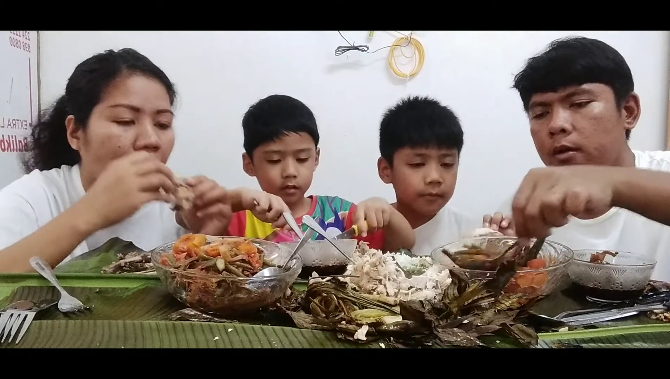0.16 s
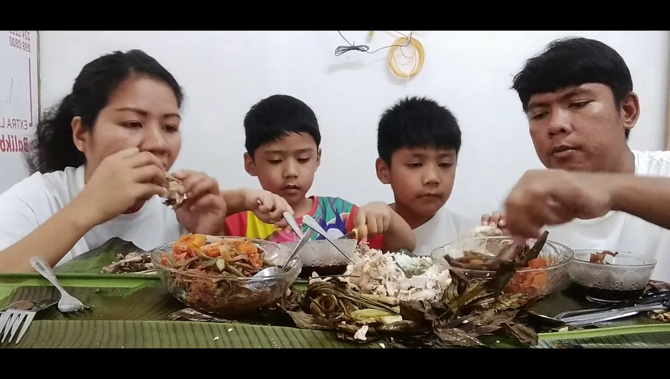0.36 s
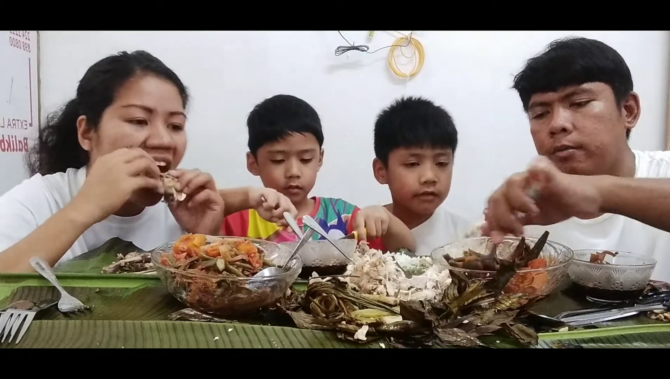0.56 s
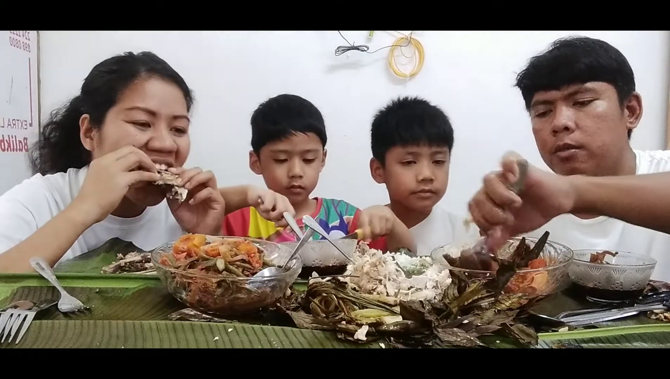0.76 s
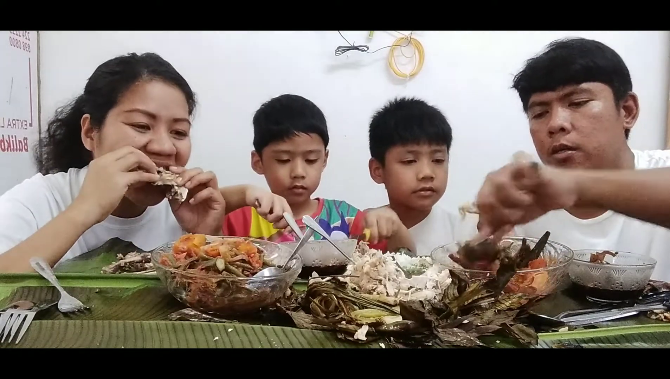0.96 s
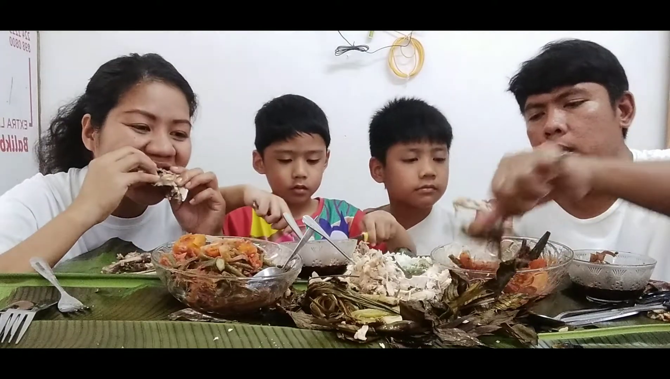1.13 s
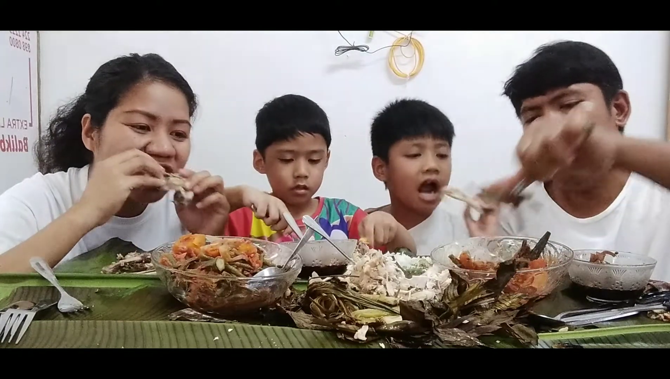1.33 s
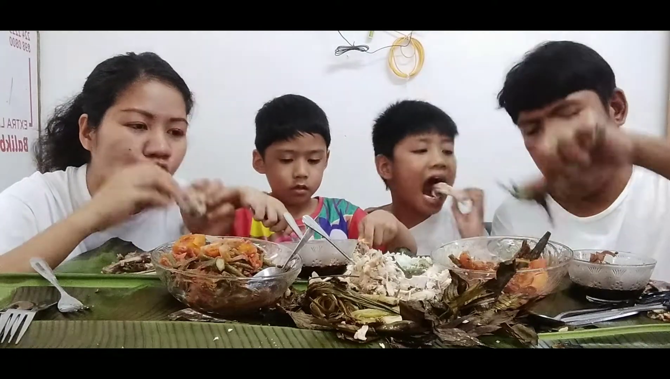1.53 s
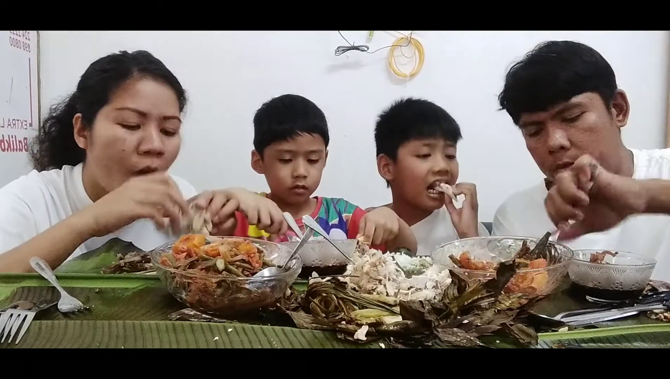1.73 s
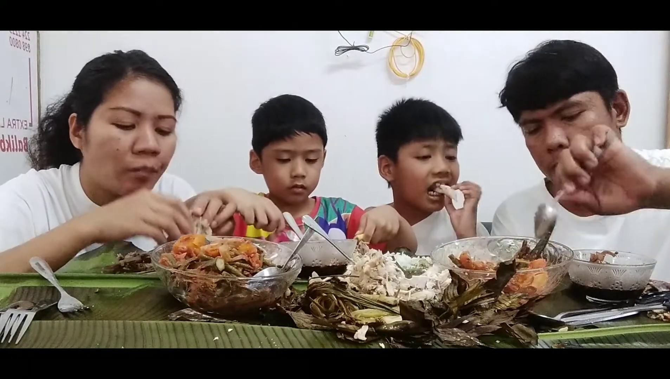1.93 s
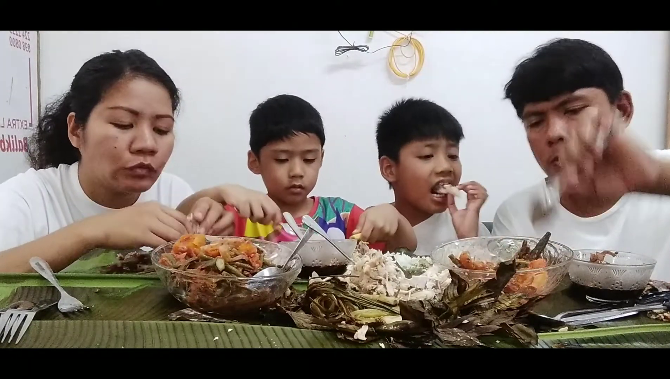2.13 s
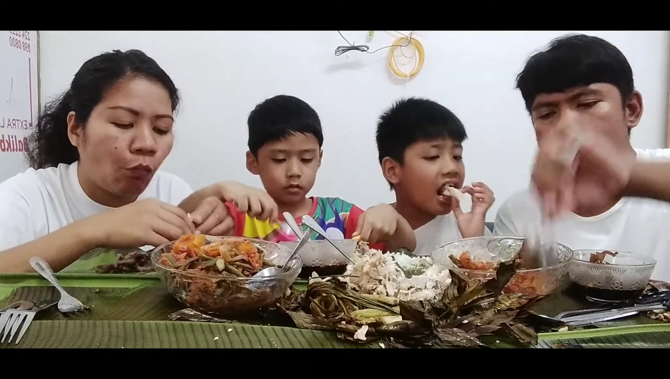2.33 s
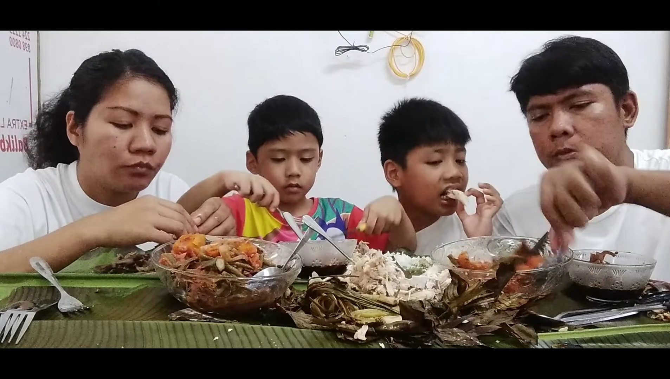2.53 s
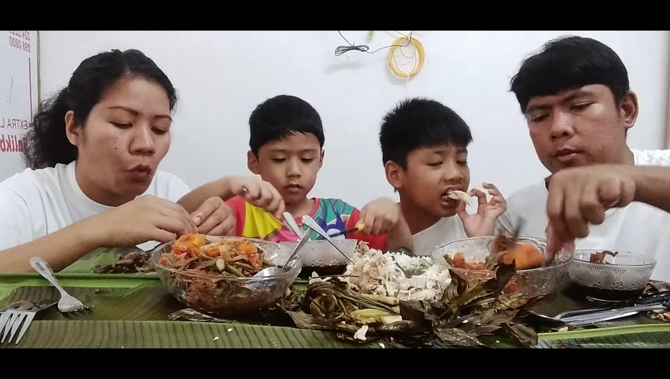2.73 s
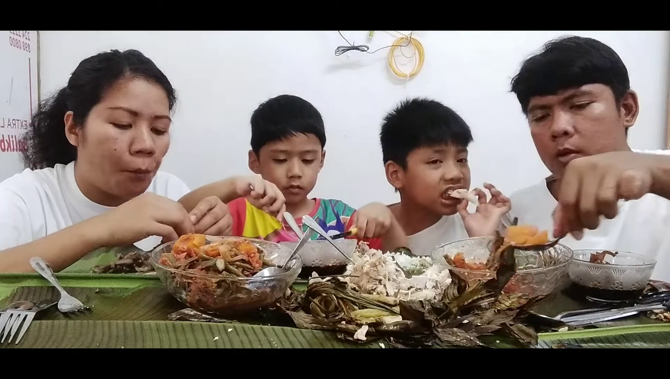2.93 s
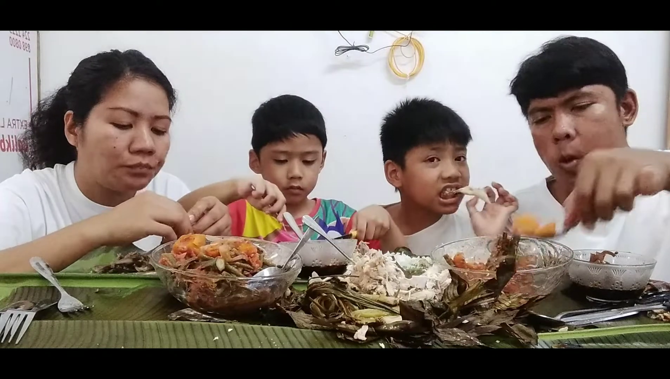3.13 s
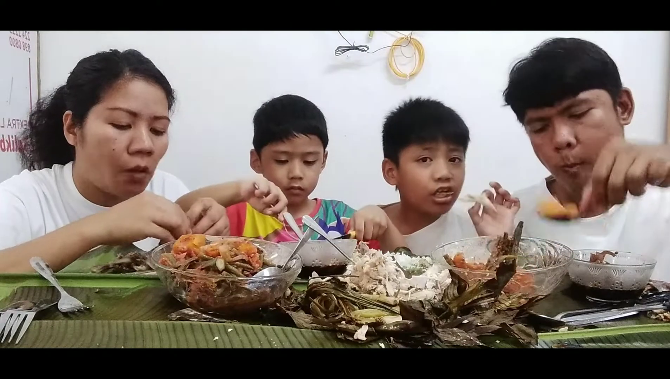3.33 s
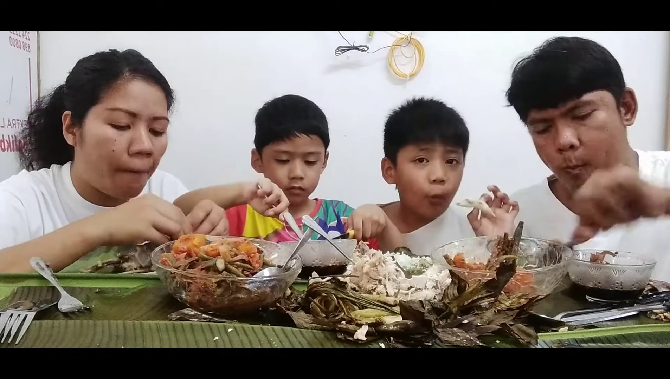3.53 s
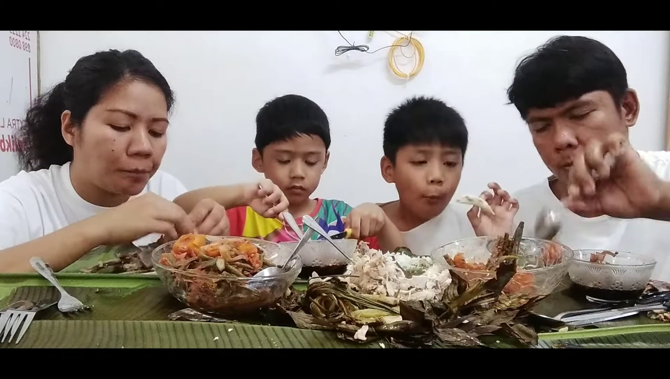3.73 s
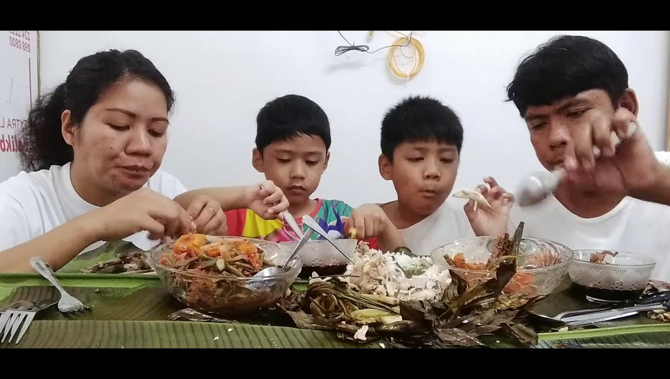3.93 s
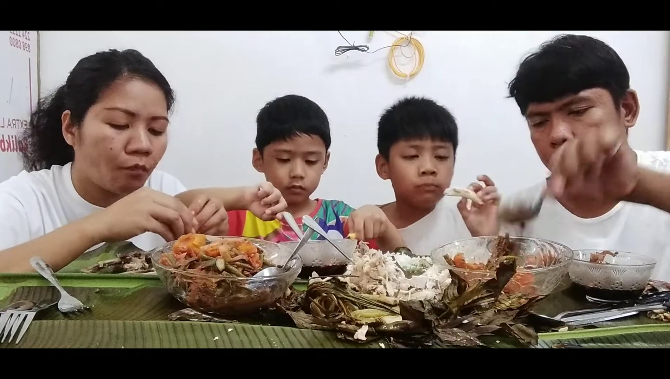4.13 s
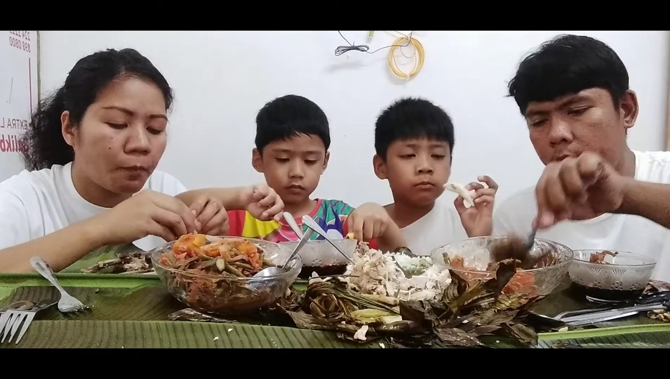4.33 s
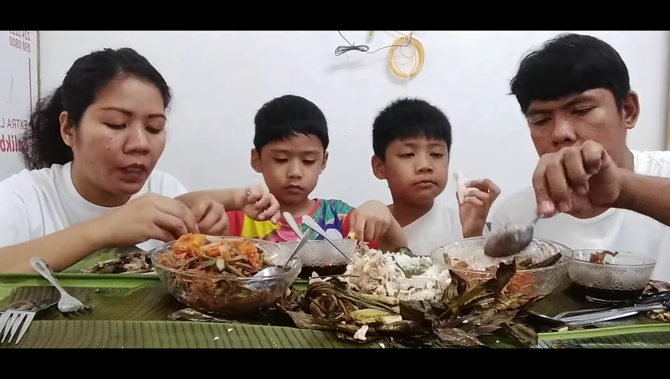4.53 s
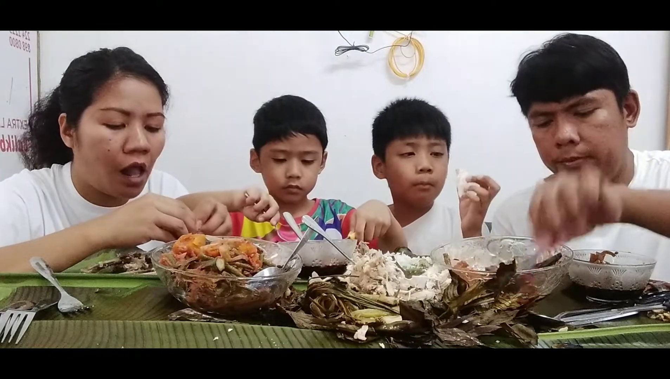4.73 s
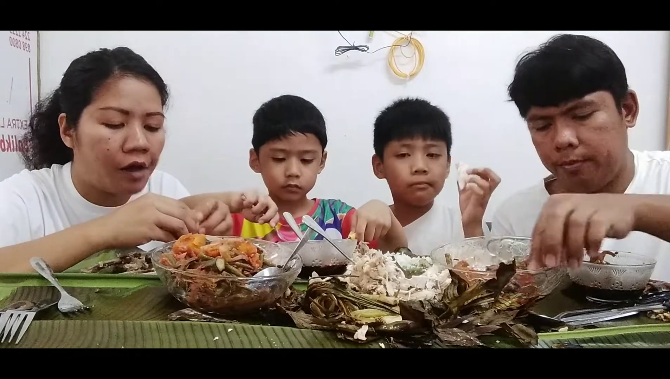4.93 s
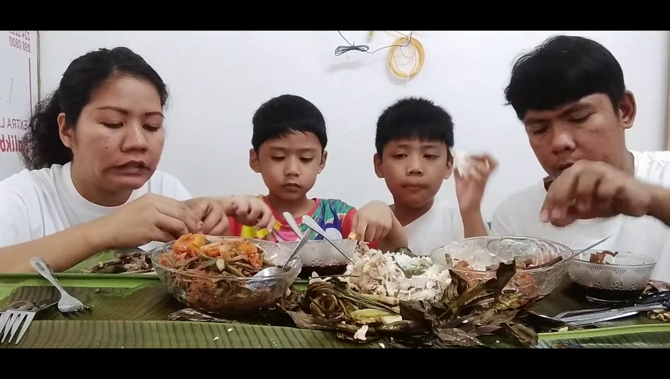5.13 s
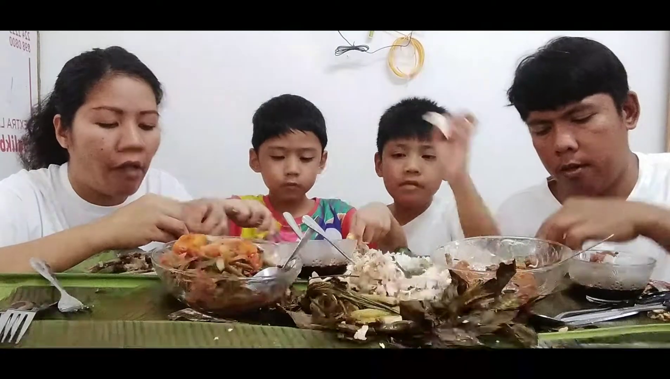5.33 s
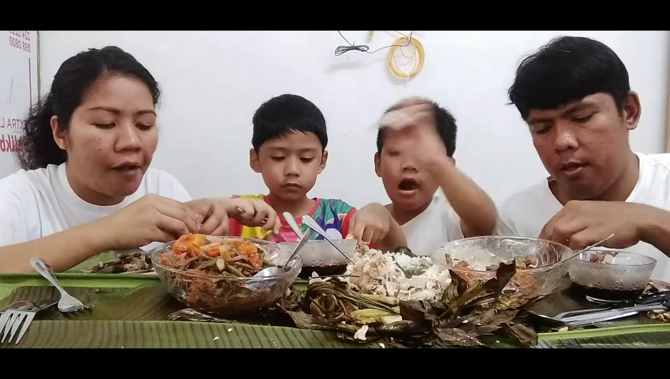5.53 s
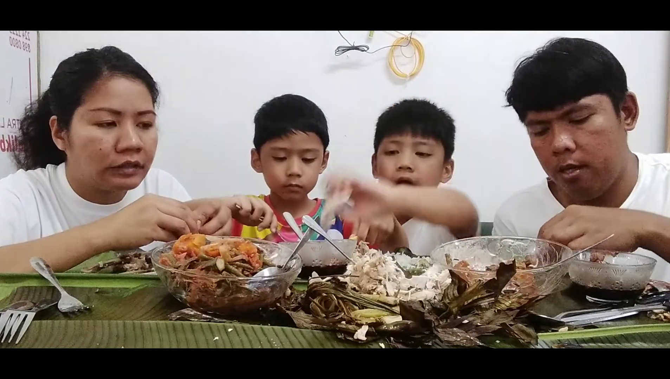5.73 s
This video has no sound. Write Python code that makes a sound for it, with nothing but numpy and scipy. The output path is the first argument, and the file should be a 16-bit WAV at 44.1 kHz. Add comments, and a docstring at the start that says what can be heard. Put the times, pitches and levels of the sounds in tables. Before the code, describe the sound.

A metal spoon on a food-filled glass serving bowl: faint dull touches and light scrapes at first, then two nearly merged firm knocks, a pause, one louder sharp rim clink and a last firm clink. Low steady rush and fan-like hum continue beneath. Stereo microphones at the table in a hard, echoing room; treble is muffled in the quiet.

```python
"""Over a low steady rush and hum of filtered noise and wavering sines, a metal spoon faintly touches and scrapes
a glass serving bowl; one dull, clearly higher clink may be another dish. It then knocks firmly near 2.5 s
(two close contacts), 4.3 s and 5.1 s, with more faint touches and faint crackles of food between. Each contact
sums a pressure swing, a noise clack, damped glass modes and a table thud; scrapes and crackles are noise snaps.
The food-filled bowl rings briefly and dense echoes from hard walls carry it on. The recorder's noise gate turns
the treble down whenever that is quiet."""
import sys
import numpy as np
from scipy import signal
from scipy.fft import next_fast_len
from scipy.io import wavfile
from scipy.ndimage import uniform_filter1d, map_coordinates

SR = 44100
rng = np.random.default_rng(int(sys.argv[2]) if len(sys.argv) > 2 else 0)


def dump_mix(stems):
    """Bounce the given channels to the path in sys.argv[1] as a 16-bit WAV at rate SR."""
    frames = np.atleast_2d(stems).T  # one column per channel
    limited = np.clip(frames, -1, 1)  # hard clip at full scale
    pcm = np.round(limited * 32767).astype(np.int16)
    wavfile.write(sys.argv[1], SR, pcm)


N = 258373

# bowl modes, each driven by the spot struck: mode_hz, t60_s, inner_wall_db, rim_db, outer_side_db
BOWL_MODES = [(711, .19, -12, -6, -18), (765, .1, -15, -10, -30), (1030, .2, -15, -12, -30),
              (1235, .12, -15, -20, -26), (1432, .16, 3, 1, 3), (1680, .14, -12, -17, -20),
              (1880, .14, -16, -16, -27), (2315, .1, -7, -5, -17), (2379, .21, -4, 3, -13),
              (2438, .08, -3, -5, -17), (2606, .14, -12, -23, -24), (3526, .18, -14, -14, -24),
              (3870, .12, -29, -25, -37), (4200, .16, -16, -20, -30), (4247, .12, -15, -29, -37),
              (4890, .18, -19, -11, -23), (6425, .14, -15, -12, -18), (6485, .09, -16, -14, -21),
              (6681, .08, -18, -19, -26), (7784, .05, -38, -27, -24), (8127, .18, -28, -15, -29),
              (9432, .1, -28, -26, -34), (9960, .12, -27, -21, -26), (10570, .1, -42, -27, -31),
              (11990, .16, -44, -33, -42), (12800, .08, -47, -38, -51), (14200, .1, -45, -38, -42)]
# left-right likeness of diffuse sound: freq_hz, correlation (share)
LIKENESS = [(50, 0.93), (180, 0.94), (350, 0.86), (700, 0.39), (1400, 0.048), (3000, 0.024)]
TAIL_S = np.arange(24000) / SR  # time axis of a sound with its echoes
RING_S = TAIL_S[:len(TAIL_S) // 2]  # time axis of a dry sound


def gain_of(db):
    """Decibels to amplitude."""
    return 10 ** (np.asarray(db) / 20)


def unit(x):
    """Scales each row to energy 1."""
    return x / np.sqrt(np.sum(x ** 2, -1, keepdims=True) + 1e-30)


def read(points, hz):
    """Reads a table of (Hz, value) on a log-frequency axis."""
    point_hz, value = np.transpose(points)
    return np.interp(np.log(hz + 1), np.log(point_hz + 1), value)


def add(mix, start_s, sound):
    """Adds a stereo sound into the mix; one struck before zero is already ringing."""
    start = round(start_s * SR)
    sound = sound[..., max(-start, 0):]
    part = mix[:, max(start, 0):][:, :sound.shape[-1]]
    part += sound[..., :part.shape[1]]


def colour(x, db_at):
    """Causal minimum-phase filter with the gain db_at(Hz)."""
    size = next_fast_len(x.shape[-1] + len(RING_S))
    hz = abs(np.fft.fftfreq(size, 1 / SR))
    log_gain = np.log(gain_of(db_at(hz)))
    response = np.exp(np.conj(signal.hilbert(log_gain)))
    return np.fft.ifft(np.fft.fft(x, size) * response).real[..., :x.shape[-1]]


def correlate(left, other, hz):
    """Mixes two independent spectra into a right channel with the tabled likeness to the left."""
    likeness = np.clip(read(LIKENESS, hz), -1, 1)[:, None]
    return likeness * left + np.sqrt(1 - likeness ** 2) * other


def rush(level_db=-45, patchy_db=1.5, size=2048):
    """Low steady noise, nearly mono in the bass, with slight drifting patches."""
    # relative spectrum: freq_hz, density_db (per Hz)
    spectrum = [(15, 2), (35, 4), (70, 2), (105, -5.5), (250, -2), (450, -8), (750, -7.5), (1300, -15),
                (2000, -20), (2600, -30.5), (3200, -33), (4000, -36), (8000, -37), (15000, -43.5)]
    hz = np.fft.rfftfreq(size, 1 / SR)
    a, b, c, d, patches = rng.standard_normal((N // (size // 4) + 5, len(hz), 5)).T
    patches = uniform_filter1d(patches, size=10, axis=0)
    patches = uniform_filter1d(patches, size=10, axis=1)
    left = a + 1j * b
    z = np.array([left, correlate(left, c + 1j * d, hz)])
    z *= gain_of(read(spectrum, hz)[:, None] + patchy_db * patches / patches.std())
    noise = signal.istft(z, nperseg=size, noverlap=size * 3 // 4)[1][:, :N]
    return gain_of(level_db) * np.sqrt(N) * unit(noise)


def hum(waver_share=0.00995, count=50):
    """A few low tones, as of a fan, each wavering by a small share of its pitch."""
    # steady tones: pitch_hz, level_db (rms)
    tones = [(48.4, -50), (145.3, -57), (263.8, -63), (646.0, -68.5)]
    out = np.zeros(N)
    for pitch_hz, level_db in tones:
        drift = np.interp(np.arange(N), np.linspace(0, N, count), rng.standard_normal(count))
        cycles = np.cumsum(pitch_hz * (1 + waver_share * drift)) / SR
        out += gain_of(level_db) * np.sqrt(2) * np.sin(2 * np.pi * cycles)
    return out


def echoes(early_db=4, early_s=0.059, size=256):
    """Dense reflections at two microphones; each band builds up and dies at its own speed."""
    # echo decay: freq_hz, t60_s
    decay = [(200, 0.17), (700, 0.47), (1500, 0.46), (2500, 0.64), (5000, 0.63), (8000, 0.6), (14000, 0.24)]
    # echo build-up: freq_hz, rise_s (time constant)
    rise = [(500, 0.0191), (2000, 0.0072), (4000, 0.021), (10000, 0.031)]
    hz, t, z = signal.stft(rng.standard_normal((2, len(TAIL_S))), SR, nperseg=size)
    z[1] = correlate(z[0], z[1], hz)
    z *= gain_of(-60 * t / read(decay, hz)[:, None])
    z *= 1 - np.exp(-t / read(rise, hz)[:, None])
    z *= gain_of(early_db * np.exp(-(t / early_s) ** 2))  # the nearest walls answer first and strongest
    return unit(signal.istft(z, SR, nperseg=size)[1][:, :len(TAIL_S)])


def room(lag_s=.0001):
    """The two ways to the microphones: direct sound, a little later on the right, and the echoes."""
    # direct sound over echoes: freq_hz, level_db
    direct_balance = [(300, -4.5), (700, 3), (1400, 4), (2400, 12.5), (3500, -8), (6500, -0.5),
                      (12000, -19)]
    direct = colour(signal.unit_impulse(len(TAIL_S)), lambda hz: read(direct_balance, hz))
    return np.array([direct, np.roll(direct, round(lag_s * SR))]), echoes()


def heard(sounds, path):
    """Sends each row down the path; each channel arrives with the energy of 50 ms at rms 1."""
    wet = signal.fftconvolve(np.atleast_2d(sounds)[:, None], path[None], axes=2)[..., :len(TAIL_S)]
    return unit(wet) * np.sqrt(SR / 20)


def glass(path):
    """Each mode of the bowl, a dying sine, as it reaches the microphones."""
    mode_hz, t60_s = np.transpose(BOWL_MODES)[:2, :, None]
    modes = np.sin(2 * np.pi * mode_hz * RING_S) * np.exp(-np.log(1000) * RING_S / t60_s)
    return heard(modes, path)


def clink(modes, path, spot, strength_db, rise_share, treble_db_per_octave,
          clack_s=0.0045, swing_hz=1700, thud_hz=195, thud_s=0.0057, corner_hz=2000,
          firm_db=-18.5, swing_growth=.35):
    """One contact: a single pressure swing, the spoon's clack, the glass ringing and a thud through the table."""
    # levels against the ring, by spot struck: clack_db, swing_db (at firm_db), thud_db
    spots = {"wall": (0, -19, -13), "rim": (-1.09, 16, -30), "side": (-6.5, -26, -17.5)}
    # relative spectrum of the spoon's many damped modes: freq_hz, density_db (per Hz)
    clack_spectrum = [(100, -18.5), (250, -11.5), (500, -15), (750, -10), (1300, 2), (1800, 1), (2100, -8),
                      (2500, -1), (3100, -15.5), (5500, -16), (7000, -19), (10300, -13.5), (11200, -55),
                      (16000, -78)]

    def hardness(hz):
        """A soft, food-cushioned touch excites less treble."""
        return treble_db_per_octave * np.log2(np.maximum(hz / corner_hz, 1))

    clack_db, swing_db, thud_db = spots[spot]
    # light touches have almost no swing: it grows by swing_growth dB more per dB of strength
    swing_db = swing_db + swing_growth * (strength_db - firm_db)

    mode_hz, _, *spot_db = np.transpose(BOWL_MODES)
    mode_db = spot_db[list(spots).index(spot)] + hardness(mode_hz)
    ring = np.tensordot(gain_of(mode_db), modes, 1)
    # contacts differ a little in pitch; one dull, clearly higher clink may be another dish
    read_at = (1 + rise_share) * TAIL_S * SR
    ring = np.array([map_coordinates(port, [read_at], order=3) for port in ring])

    burst = rng.standard_normal(len(RING_S)) * np.exp(-RING_S / clack_s)
    clack = colour(burst, lambda hz: read(clack_spectrum, hz) + hardness(hz))
    thud = np.sin(2 * np.pi * thud_hz * RING_S) * np.exp(-RING_S / thud_s)
    clack, thud = heard([clack, thud], path)

    phase = 2 * np.pi * swing_hz * TAIL_S - 2 * np.pi  # swing centred one cycle in
    swing = np.sin(phase) * np.exp(-(phase / np.pi) ** 2)
    contact = ring + gain_of(clack_db) * clack + gain_of(thud_db) * thud + gain_of(swing_db) * swing
    return gain_of(strength_db) * contact


def scrape_or_crackle(level_db, centre_hz, path, skirt_db=20, uneven_db=4, count=600, bowl_db=10, width_hz=110,
                      swell_ref_s=0.017, swell_ref_hz=3220, swell_power=2.5):
    """A cluster of uneven snaps around one pitch that swells and fades, the faster the higher it is."""
    def shape(hz):
        """A broad hump, lifted around the modes of the bowl."""
        off_mode_hz = abs(hz[:, None] - np.transpose(BOWL_MODES)[0]).min(1)
        lift_db = bowl_db * np.exp(-(off_mode_hz / width_hz) ** 2)
        octaves = np.log2(np.clip(hz / centre_hz, 1 / 4, 4))
        return lift_db - skirt_db * octaves ** 2

    # higher snaps are over sooner
    swell_s = swell_ref_s * (swell_ref_hz / centre_hz) ** swell_power
    snap_gain = gain_of(uneven_db * rng.standard_normal(count))
    snaps = snap_gain[np.arange(len(RING_S)) * count // len(RING_S)]
    rustle = rng.standard_normal(len(RING_S)) * snaps * RING_S * np.exp(-RING_S / swell_s)
    return gain_of(level_db) * heard(colour(rustle, shape), path)[0]


def microphone_ports(sound):
    """Each microphone port favours its own bands."""
    # channel balance: freq_hz, left_over_right_db
    balance = [(700, -2), (1430, 0.5), (2400, -5), (3600, 5), (4900, 7), (7500, 7), (8200, 7.5), (8800, 9),
               (10000, -10.5), (12000, 0)]
    click = signal.unit_impulse(512)
    ports = np.array([colour(click, lambda hz: side * read(balance, hz) / 2) for side in (1, -1)])
    return signal.oaconvolve(sound, ports, axes=1)[:, :N]


def scene(spoon_shadow_db=-6, snap_wet_db=-10):
    """Clinks, scrapes and crackles on the table, over the background."""
    # clinks, mostly spoon on bowl: start_s, spot (name), strength_db, pitch_rise (share), treble_db_per_octave
    clinks = [(-0.02, "side", -56.5, 0.0077, -2), (0.124, "wall", -63.5, 0, 5.5),
              (0.154, "side", -53, 0, -2), (0.176, "side", -46, 0.016, -5),
              (0.246, "wall", -50, 0.017, -8.5), (0.271, "side", -53, 0.097, -20),
              (0.945, "wall", -59.5, 0.0099, 0), (2.4938, "wall", -31, 0.0071, -1),
              (2.5065, "wall", -30, 0.0022, -4.5), (3.705, "rim", -64.5, 0, -11),
              (4.3071, "rim", -23, 0.0019, -1), (4.9792, "wall", -57, 0, -6), (5.025, "side", -52, 0, -9.5),
              (5.084, "side", -32, 0, 0)]
    # spoon scrapes on the bowl at first, then faint crackles of food: start_s, level_db, centre_hz
    scrapes_and_crackles = [(0.113, -58.5, 3250), (0.163, -50, 3100), (0.247, -53.5, 3600),
                            (0.543, -61, 2720), (0.952, -65, 4340), (0.957, -69.5, 8240),
                            (3.403, -72, 6000), (3.475, -57, 4170), (4.768, -69, 7000)]
    table = np.zeros((2, N))
    direct, wet = room()
    modes = glass(direct + wet)
    inside = gain_of(spoon_shadow_db) * direct + wet  # the bowl screens the direct clack and thud
    for start_s, *contact in clinks:
        add(table, start_s, clink(modes, inside, *contact))
    near = signal.unit_impulse(len(TAIL_S)) + gain_of(snap_wet_db) * wet
    for start_s, level_db, centre_hz in scrapes_and_crackles:
        add(table, start_s, scrape_or_crackle(level_db, centre_hz, near))
    return microphone_ports(table) + rush() + hum()


def record(dry, split_hz=2950, sense_hz=6800, sense_s=0.015, threshold_db=-64.0, knee_db=1.5, depth_db=19,
           edge_hz=15400):
    """A gate turns the treble down while it is quiet; then the band limit."""
    highpass = signal.firwin(201, split_hz, pass_zero=False, fs=SR)
    treble = signal.oaconvolve(dry, highpass[None], "same")
    sense = signal.butter(N=4, Wn=sense_hz, btype="high", fs=SR, output="sos")
    top = signal.sosfilt(sense, treble)
    keep = np.exp(-1 / (sense_s * SR))
    power = signal.lfilter([1 - keep], [1, -keep], (top ** 2).mean(0))
    level_db = 10 * np.log10(power + 1e-14)
    shut = (1 - np.tanh((level_db - threshold_db) / knee_db)) / 2  # 0 open, 1 shut
    gated = dry - treble * (1 - gain_of(-depth_db * shut))
    lowpass = signal.firwin(511, edge_hz, window=("kaiser", 9), fs=SR)
    return signal.oaconvolve(gated, lowpass[None], "same")


dry = scene()
out = record(dry)
dump_mix(out)
```